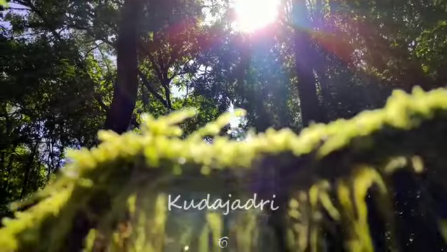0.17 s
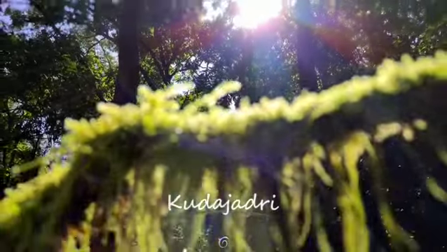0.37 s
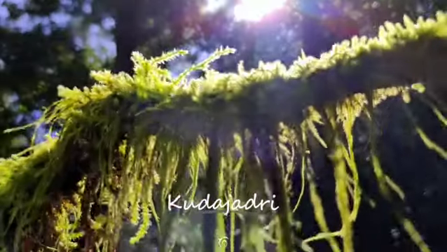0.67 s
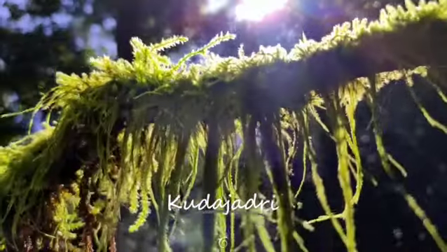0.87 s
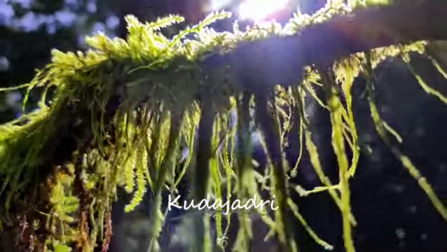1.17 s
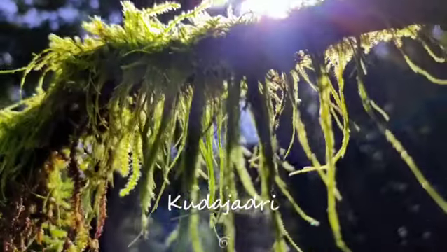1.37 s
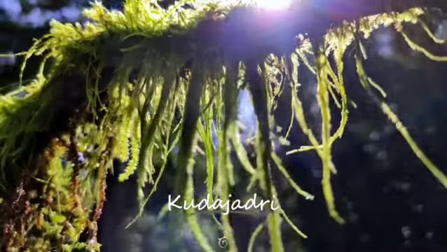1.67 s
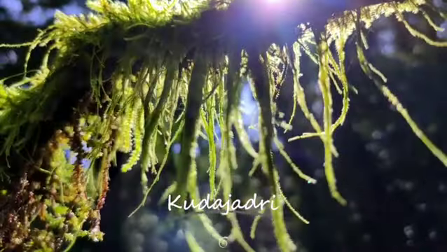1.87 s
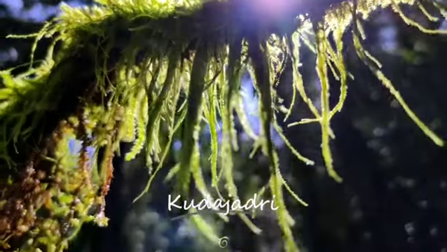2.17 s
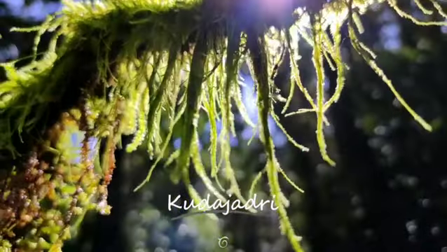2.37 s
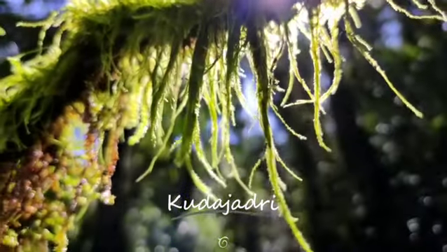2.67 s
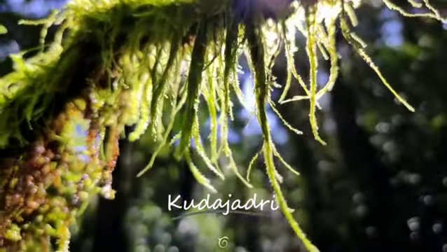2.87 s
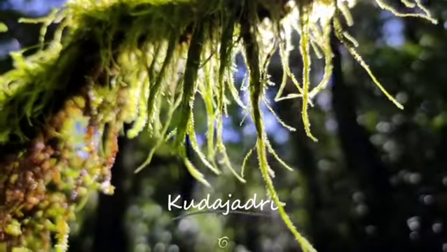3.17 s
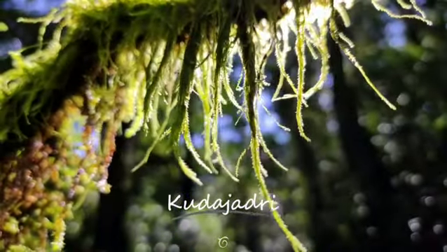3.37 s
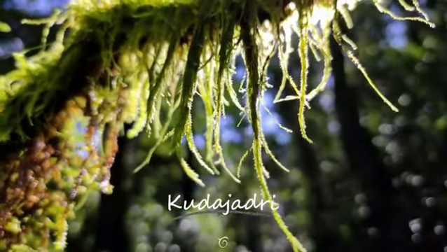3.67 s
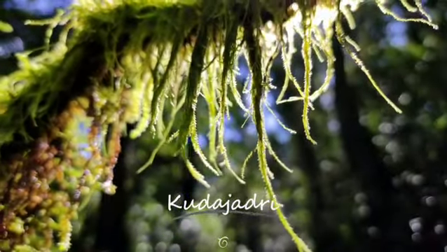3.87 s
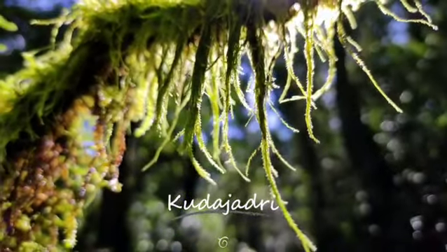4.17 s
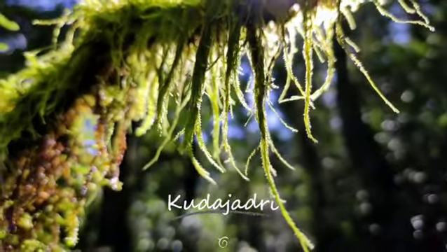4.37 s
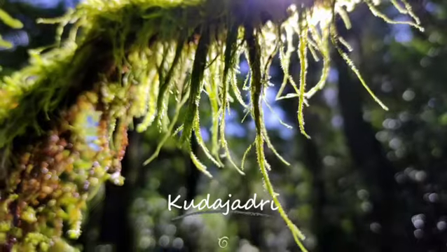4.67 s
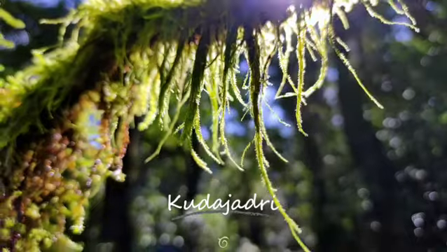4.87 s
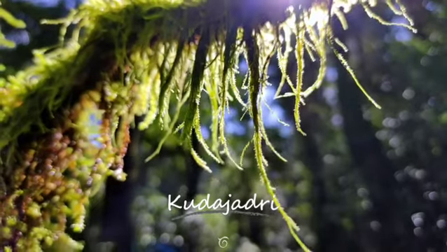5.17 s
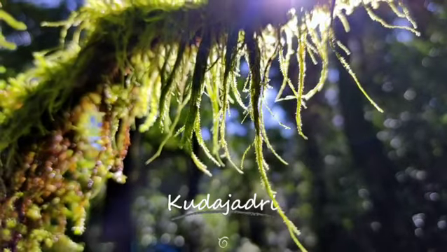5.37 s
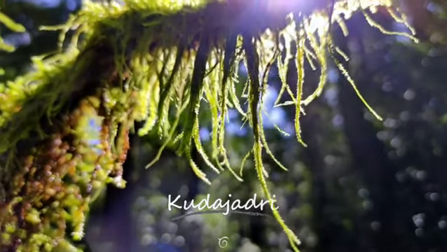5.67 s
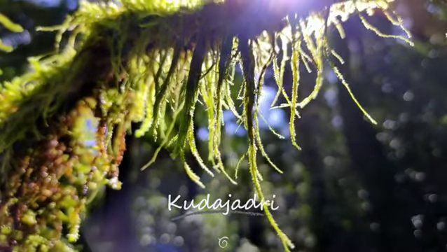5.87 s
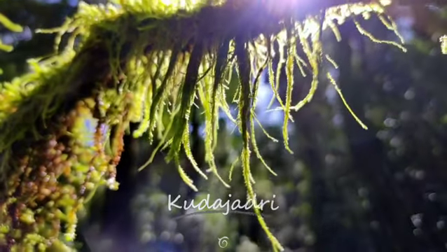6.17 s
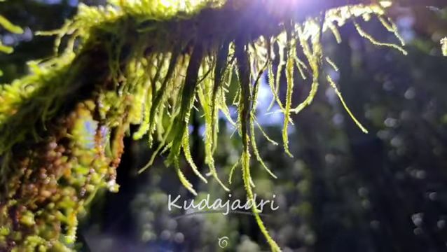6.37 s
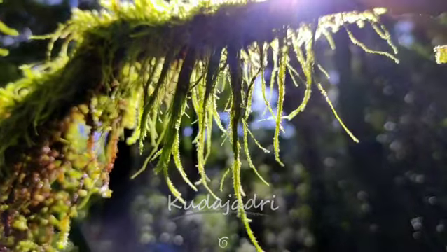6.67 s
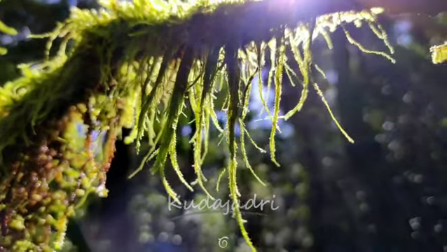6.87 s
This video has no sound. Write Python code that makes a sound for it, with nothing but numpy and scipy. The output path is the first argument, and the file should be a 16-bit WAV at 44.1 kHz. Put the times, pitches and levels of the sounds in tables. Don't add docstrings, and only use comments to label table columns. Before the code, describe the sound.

Seven seconds in a forest, in stereo with short echoes from trunks. A loud low engine drone near 100 Hz wavers throughout, with a second, fainter engine speeding up around 6 s, beneath leaf hiss and far traffic that fade slightly after 5.3 s. A bird whistles downward at once, another rises at 0.3 s, and a fast buzzy warble follows at 0.7 s. A near insect, left, sings quick falling chirps around 5 kHz at 0.3, 1.2, 1.8, 2.4, 3.4, 4.4, 5.0, 6.0 and 6.5 s. A faint high insect trills between; a lower one trills from 3.7 s, mostly continuously until 6.2 s. A high peep at 4.7 s and thin whistle at 5.0 s lead to warbles from 5.3 s and small falling coos after 6.3 s. Soft air lumps push the microphone, strongest near 0, 2.7 and 5.1 s. A faint tick and soft hollow knock come at 6.9 s, then abrupt silence.

```python
import sys
import numpy as np
from scipy import signal
from scipy.fft import rfft, irfft
from scipy.io import wavfile
from scipy.ndimage import uniform_filter1d

SR = 44100
rng = np.random.default_rng(int(sys.argv[2]) if len(sys.argv) > 2 else 0)


def materialize(psi):
    bounded = np.clip(np.atleast_2d(psi).T, -1, 1)
    quanta = np.round(bounded * 32767).astype(np.int16)
    wavfile.write(sys.argv[1], SR, quanta)


def elevation(decibels):
    levels = np.asarray(decibels, float)
    return 10 ** (levels / 20)


N = 310023
T = np.arange(N) / SR


def evened(x):
    return x / np.sqrt(np.mean(x ** 2) + 1e-20)


def read(points, hz):
    f, value = np.transpose(points)
    return np.interp(np.log(hz + 1), np.log(f + 1), value)


def columns(rows, t):
    s, *rest = np.transpose(rows)
    return [np.interp(t, s, c) for c in rest]


def add(mix, start_s, sound):
    part = mix[:, round(start_s * SR):][:, :sound.shape[1]]
    part += sound[:, :part.shape[1]]


def ports(turns, pan_db, lead_rad):
    side = np.array([[.5], [-.5]])
    return np.sqrt(2) * elevation(side * pan_db) * np.sin(2 * np.pi * turns + side * lead_rad)


def drift(below_hz, count):
    z = rfft(rng.standard_normal((count, N)))
    lowpass = 1 / (1 + (np.fft.rfftfreq(N, 1 / SR) / below_hz) ** 4)
    return evened(irfft(z * lowpass, N))


def beats(first_s, last_s, gap_s):
    count = round((last_s - first_s) / gap_s) + 1
    return np.arange(count), np.linspace(first_s, last_s, count)


def woods(x, t60_s, gap_s):
    t = np.arange(SR // 2) / SR
    signs = rng.choice([-1., 1.], (2, len(t)))
    taps = signs * (rng.random((2, len(t))) < .05)
    taps *= elevation(-60 * t / t60_s) * (t > gap_s)
    return signal.fftconvolve(x, taps / np.linalg.norm(taps[0]), axes=1)[:, :N]


def call(row, pan_db, knee, reached, depth_hz, rise_s, sag_db, lead_rad, per_s, start_turn, throb_db):
    # multiple, level_db
    overtones = [(2, -26), (3, -56), (4, -31), (5, -37.5)]
    soft_start_db, release_s, release_db = -10.5, .02, -14
    rasp = .3
    start_s, length_s, row_db, from_hz, to_hz = row
    t = np.arange(0, length_s, 1 / SR)
    u = t / length_s
    glide = uniform_filter1d(np.interp(u, [0, knee, 1], [0, reached, 1]), size=600, mode="nearest")
    pitch_hz = from_hz + (to_hz - from_hz) * glide

    swing = 2 * np.pi * (per_s * t + start_turn)
    shake = evened(uniform_filter1d(rng.standard_normal(SR // 2), size=200))[:len(t)]
    turns = np.cumsum(pitch_hz + depth_hz * (np.cos(swing) + rasp * shake)) / SR
    tone = ports(turns, pan_db, lead_rad)
    tone = tone + sum(elevation(db) * ports(k * turns, 1.5, k * lead_rad) for k, db in overtones)

    level_db = row_db + soft_start_db * np.clip(1 - t / rise_s, 0, 1) + sag_db * u
    level_db += release_db * np.clip(1 - (length_s - t) / release_s, 0, 1)
    level_db += throb_db * np.cos(swing - .6)
    return start_s, elevation(level_db) * tone * signal.windows.tukey(len(t), .08)


def birds():
    # start_s, length_s, level_db, first_pitch_hz, last_pitch_hz
    whistles = [
        (0.03, .21, -29, 1691, 1375),
    ]
    risers = [
        (0.335, .25, -29.5, 1653, 2584),
    ]
    peep = [
        (4.74, 0.046, -31.5, 2977, 3096),
    ]
    thin = [
        (5.03, .19, -40, 1496, 1577),
    ]
    buzz = [
        (0.695, .225, -32, 1952, 2127),
    ]
    warbles = [
        (5.29, 0.24, -29, 1560, 1590),
        (5.62, 0.2146, -28, 1630, 1509),
        (5.915, 0.1984, -28.5, 1534, 1512),
    ]
    high_warbles = [
        (6.205, 0.163, -30.5, 1872, 1936),
        (6.61, 0.12, -29.5, 2132, 1869),
    ]
    low_coos = [
        (6.35, 0.091, -35, 1340, 920),
        (6.74, 0.14, -37, 1298, 968),
    ]
    # lead_rad, warbles per_s, start_turn, throb_db
    kinds = [
        (whistles, -8, .55, .15, 12, .018, -8, 2.1, 21, .5, 1.2),
        (risers, 4, .52, .78, 12, .015, -2.5, 2.1, 21, .2, 1.2),
        (peep, -15, .45, .3, 5, .02, -3, 2.1, 21, .2, .4),
        (thin, 3, .7, .1, 9, .04, -1.2, 2.3, 15.5, .7, .6),
        (buzz, 3, .4, .6, 215, .03, -3, 2.3, 43, .6, 1.5),
        (warbles, 3, .45, .45, 68, .05, -6, 2.3, 15.5, .7, 3),
        (high_warbles, -1.5, .25, .7, 110, .015, -2.5, 2.3, 19, .95, 5),
        (low_coos, 1.5, .17, .72, 30, .008, -6, 2.1, 21, .8, 3)]
    out = np.zeros((2, N))
    for calls, *manner in kinds:
        for row in calls:
            add(out, *call(row, *manner))
    return elevation(4.0) * out + elevation(-0.5) * woods(out, t60_s=0.27, gap_s=0.007)


def stroke(level_db, mid_hz, fall_hz, length_s, pan_db):
    u = np.arange(0, 1, 1 / (length_s * SR))
    shape = np.exp(-((u - .38) / .15) ** 2) + 0.3 * np.sin(np.pi * u)
    turns = np.cumsum(mid_hz + fall_hz * (.38 - u)) / SR
    tone = ports(turns, pan_db, 1.61) + elevation(-30.5) * ports(2 * turns, pan_db, .3)
    return elevation(level_db - 5) * shape * tone


def near_insect():
    # first_stroke_s, last_stroke_s, first_stroke_db, full_strength_db
    bursts = [
        (0.297, 0.5156, -34, -27),
        (1.214, 1.5416, -36, -27.5),
        (1.823, 2.1006, -38, -26.5),
        (2.43, 2.6496, -36.5, -26.5),
        (3.391, 3.61, -37.5, -28.5),
        (4.425, 4.75, -34, -27.5),
        (5.027, 5.242, -36.5, -26.5),
        (5.999, 6.223, -38, -27.5),
        (6.460, 6.784, -36.5, -27),
    ]
    stroke_gap_s, early_s, uneven_db = .0555, .008, -0.1
    warm_up = .45
    out = np.zeros((2, N))
    for first_s, last_s, first_db, full_db in bursts:
        k, times_s = beats(first_s + early_s, last_s, stroke_gap_s)
        shortfall = warm_up ** k
        starts_s = times_s - early_s * shortfall
        levels_db = full_db + (first_db - full_db) * shortfall
        for s, db, (a, b, c, d) in zip(starts_s, levels_db, rng.standard_normal((8, 4))):
            effort_db = db + 28
            mid_hz = 5000 + 36 * effort_db + 60 * a
            fall_hz = 1600 + 60 * effort_db + 200 * b
            one = stroke(db + uneven_db * c, mid_hz, fall_hz, length_s=0.034, pan_db=-11.5)
            add(out, s - .009, one)
            add(out, s + .002 + .004 * b, elevation(-13 + 5 * d) * one)
    return out + elevation(-7.0) * woods(out, t60_s=0.28, gap_s=.006)


def far_insects():
    # start_s, end_s, level_db
    high_bouts = [
        (0.101, .3, -44.5),
        (0.623, 1.0, -45),
        (2.702, 3.147, -42.5),
        (3.822, 4.155, -43.5),
        (5.291, 5.785, -42),
    ]
    # first_stroke_s, last_stroke_s, level_db
    low_bouts = [
        (3.691, 3.922, -32),
        (4.143, 4.2133, -32),
        (4.357, 5.4031, -31),
        (5.475, 6.1744, -32.5),
        (6.485, 6.563, -36),
        (6.775, 6.9496, -35.5),
    ]
    low_gap_s = .076
    out = np.zeros((2, N))
    for start_s, end_s, level_db in high_bouts:
        times_s = np.arange(start_s, end_s, 1 / 16.0)
        for s, (a, b, c) in zip(times_s, rng.standard_normal((10, 3))):
            swell_db = -7 * (2 * (s - start_s) / (end_s - start_s) - 1) ** 4
            one_db = level_db + swell_db + 7 + 0.86 * a
            add(out, s + .003 * c, stroke(one_db, 4720 + 70 * b, 1120, length_s=0.029, pan_db=-1.5))
    for first_s, last_s, level_db in low_bouts:
        _, times_s = beats(first_s, last_s, low_gap_s)
        for s, a in zip(times_s, rng.standard_normal(16)):
            one_db = level_db - 1.5 + 2.0 * a
            add(out, s - .008, stroke(one_db, 2120, 948, length_s=0.02926, pan_db=3.5))
    return out + elevation(0.5) * woods(out, t60_s=0.3, gap_s=0.0039)


def drone():
    # time_s, firing_hz, level_db, pan_db
    course = [(0.0, 101.1, -11.5, 5.5), (0.21, 101.3, -11.5, -3.5), (0.45, 100.5, -18, 0),
              (1.16, 98.1, -16, -6), (1.88, 102, -30, 2.5), (1.96, 99.35, -22.5, 2.5),
              (2.52, 98.1, -16.5, -4.5), (2.91, 97.9, -18, 0.5), (3.24, 97.16, -20.5, -13.5),
              (3.37, 96.7, -31.5, 0), (3.62, 96.1, -24, -7), (3.89, 96.4, -23.5, 2), (3.99, 96.8, -14, 0),
              (4.67, 94.8, -15, -5.5), (5.35, 95.3, -16, 0), (5.72, 94.8, -17.5, -3.5),
              (6.32, 95.64, -32, 5.5), (6.96, 93.8, -18.5, -3.5)]
    second_db, third_db = -46, -52.5
    firing_hz, level_db, pan_db = columns(course, T)
    flutter = drift(10.8, count=4)
    part_db = 0.17 * (level_db + 19)
    swell_db = 4.4 * np.exp(-((T - 3.7) / 1) ** 2)
    turns = np.cumsum(firing_hz + 0.24 * flutter[0]) / SR
    out = elevation(level_db + 0.8 * drift(10.0, count=1)) * ports(turns, pan_db, -0.67)
    out += elevation(second_db + part_db + 2.64 * flutter[1]) * ports(2 * turns, 1.5, 1.0)
    out += elevation(third_db + swell_db + 2.8 * flutter[2]) * ports(3 * turns, .3, -1.2)
    return out


def hum():
    # time_s, firing_hz, level_db
    course = [
        (0, 53.05, -36),
        (5.4, 52.5, -35.5),
        (6.0, 57.84, -35),
        (6.4, 58.3, -45),
        (6.97, 61.5, -40.5),
    ]
    # multiple, level_db
    orders = [(.5, -9), (1, 5), (1.5, -11.5), (2, -4)]
    firing_hz, level_db = columns(course, T)
    turns = np.cumsum(firing_hz) / SR
    level_db = level_db + 1.4 * drift(1.3, count=1)
    return sum(elevation(level_db + own_db) * ports(k * turns, 4.5, 0.14) for k, own_db in orders)


def noise(colour, patchy_db):
    # freq_hz, left_right_likeness
    likeness = [(60, 0.32), (170, 0.77), (510, 0.5), (1480, 0.36), (4310, -0.14), (12600, 0.019)]
    # freq_hz, left_right_db
    balance = [(60, -6), (170, 0.5), (510, 2.5), (1480, 3), (4310, 2.5), (12600, 0.5)]
    frame_count, hz = N // 512 + 5, np.fft.rfftfreq(2048, 1 / SR)
    a, b, c, d, patches = rng.standard_normal((frame_count, 1025, 5)).T
    patches = uniform_filter1d(patches, size=24, axis=0)
    patches = evened(uniform_filter1d(patches, size=6, axis=1))
    same = np.clip(read(likeness, hz), -1, 1)[:, None]
    left = a + 1j * b
    right = same * left + np.sqrt(1 - same ** 2) * (c + 1j * d)
    lean_db = read(balance, hz)[:, None] / 2
    colour_db = read(colour, hz)[:, None] + patchy_db * patches
    z = np.array([left, right]) * elevation(colour_db + np.array([lean_db, -lean_db]))
    return evened(signal.istft(z, nperseg=2048, noverlap=1536)[1][:, :N])


def hiss():
    # freq_hz, density_db_per_hz
    leaves = [(240, -10), (400, -2.5), (512, -6), (601, -3.5), (738, -4.5), (805, -3.5), (1180, -4.5),
              (1570, -5), (2780, -8), (4120, -10), (4690, -9.5), (6280, -19.5), (11000, -28.5),
              (13000, -31.5)]
    # freq_hz, density_db_per_hz
    traffic = [(12, -20), (25, 0.5), (40, -6.5), (75, 4.5), (120, -3.5), (200, -6.5), (320, -14),
               (600, -46)]
    hiss_db, fade_from_s, fade_db_per_s = -41.5, 5.26, -3
    mixed = elevation(7.0) * noise(leaves, patchy_db=0.5) + elevation(6.5) * noise(traffic, patchy_db=1.5)
    return elevation(hiss_db + fade_db_per_s * np.maximum(T - fade_from_s, 0)) * mixed


def air_push():
    # time_s, peak_db, half_length_s
    gusts = [(0.023, -13.5, 0.15), (0.49, -17, .1), (1.213, -18.5, 0.22), (1.922, -21, 0.33),
             (2.404, -22, 0.029), (2.68, -12, 0.2), (3.652, -20.5, 0.36), (4.304, -21.5, .15),
             (5.083, -12.5, .15), (5.997, -19.5, 0.17), (6.754, -26, 0.12)]
    calm_db = -31.5
    highpass = signal.butter(2, 3.0, "high", fs=SR, output="sos")
    lumps = evened(signal.sosfilt(highpass, drift(8.1, count=2)))
    strength = elevation(calm_db) + sum(elevation(db) * np.exp(-((T - s) / half_s) ** 2) for s, db, half_s in gusts)
    return strength * elevation([[2.5], [.6]]) * lumps


def handling():
    knock_s, knock_db, knock_hz, knock_t60_s = 6.925, -37.5, 485, 0.46
    tick_s, tick_db, tick_t60_s = 6.883, -47, 0.016
    out, t = np.zeros((2, N)), np.arange(4000) / SR
    knock = elevation(knock_db - 60 * t / knock_t60_s) * ports(knock_hz * t, 0, 0)
    add(out, knock_s, knock * np.minimum(t / 0.0067, 1))
    add(out, tick_s, elevation(tick_db - 60 * t / tick_t60_s) * rng.standard_normal((2, len(t))))
    return out


def scene():
    animals = birds() + near_insect() + far_insects()
    return animals + drone() + hum() + hiss() + air_push() + handling()


def starved(x):
    # freq_hz, share_of_bands_dropped
    holes = [(1200, 0.00083), (2600, .09), (8000, .11), (10500, 0.29), (11500, 0.45), (13000, .85)]
    hz, _, z = signal.stft(x, SR, nperseg=1024, noverlap=768)
    band = np.minimum((hz / (70 + hz / 80)).astype(int), 63)
    luck = rng.random((z.shape[2] // 5 + 1, 65))
    luck = np.repeat(luck, 5, axis=0)[:z.shape[2]].T
    draw = np.where(hz[:, None] > 10800, (luck[band] + 2 * luck[64]) / 3, luck[band])
    power = uniform_filter1d((abs(z) ** 2).sum(0), size=7, axis=0)
    power = uniform_filter1d(power, size=5, axis=1)
    weak = power < 2.2 * np.median(power, axis=1)[:, None]
    gain = np.where(weak & (draw < read(holes, hz)[:, None]), elevation(-30), 1)
    return signal.istft(z * gain, SR, nperseg=1024, noverlap=768)[1][:, :N]


def roll_off(x):
    return signal.sosfilt(signal.butter(12, 13500, fs=SR, output="sos"), x)


def record(dry):
    end_s = 6.9695
    stop = np.clip((end_s - T) * SR / 20, 0, 1)
    return roll_off(starved(dry) * stop)


dry = scene()
out = record(dry)
materialize(out)
```